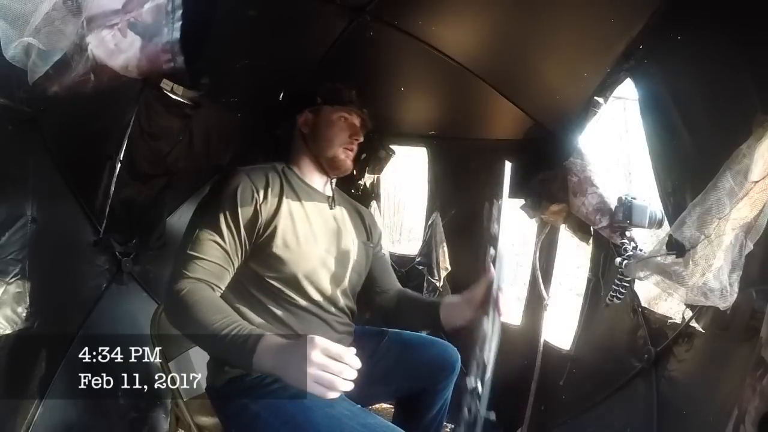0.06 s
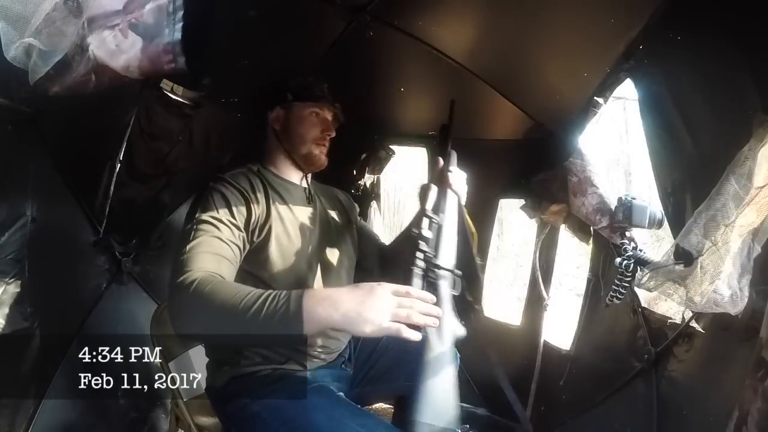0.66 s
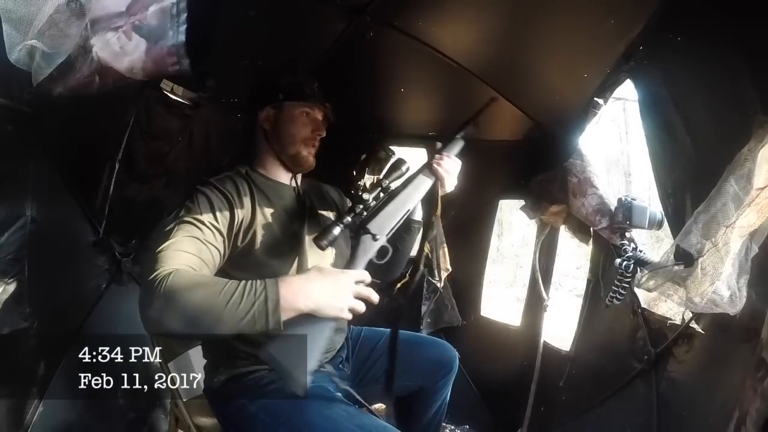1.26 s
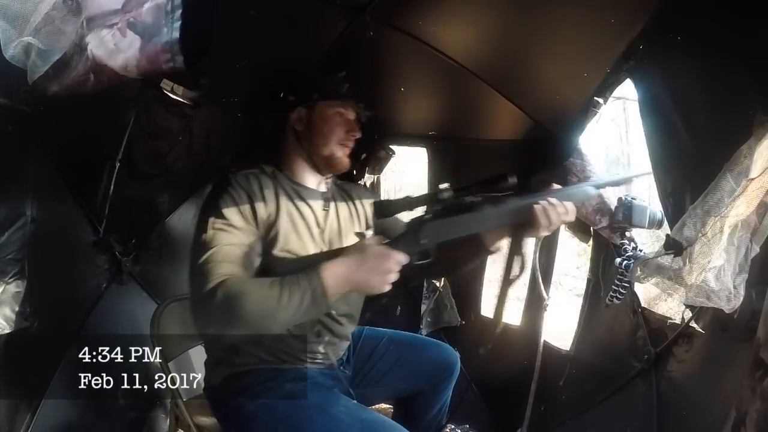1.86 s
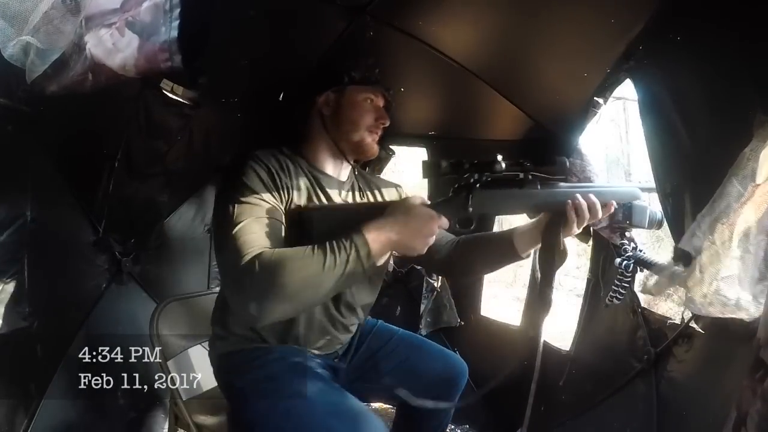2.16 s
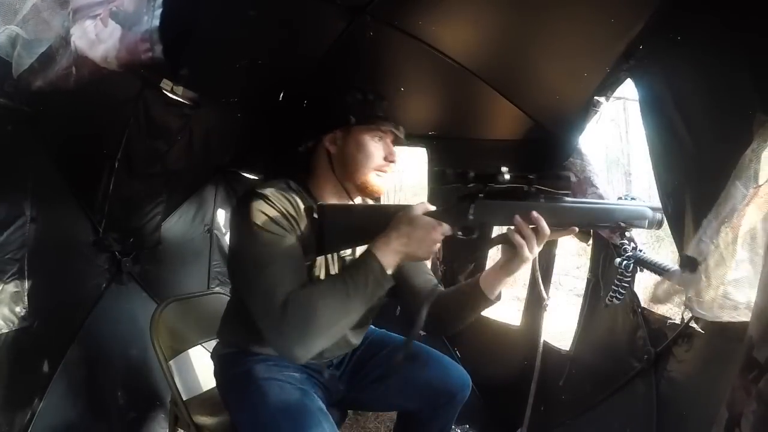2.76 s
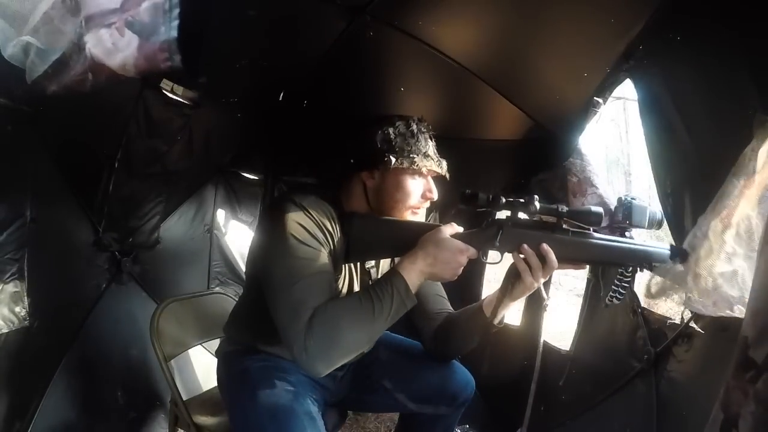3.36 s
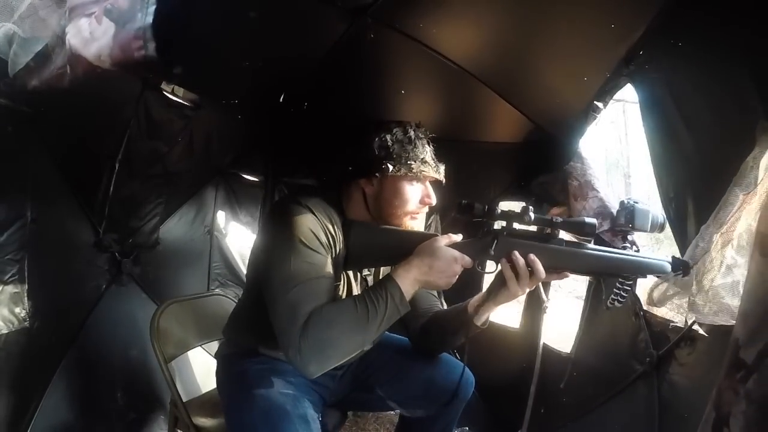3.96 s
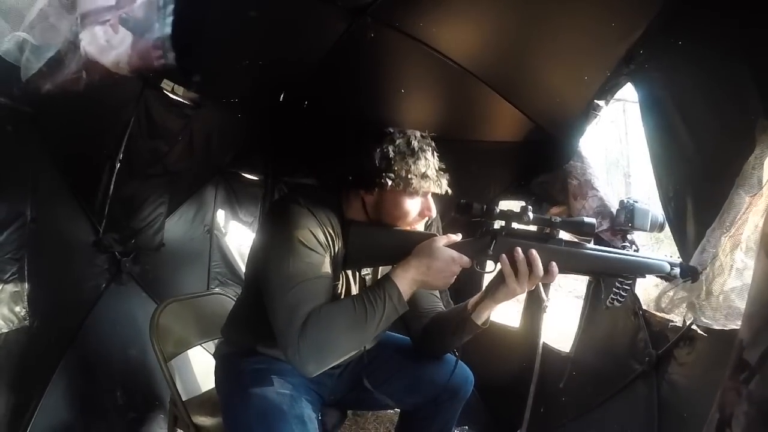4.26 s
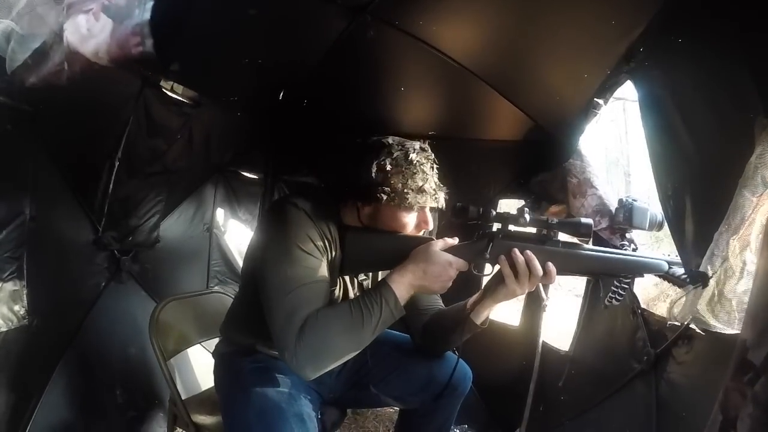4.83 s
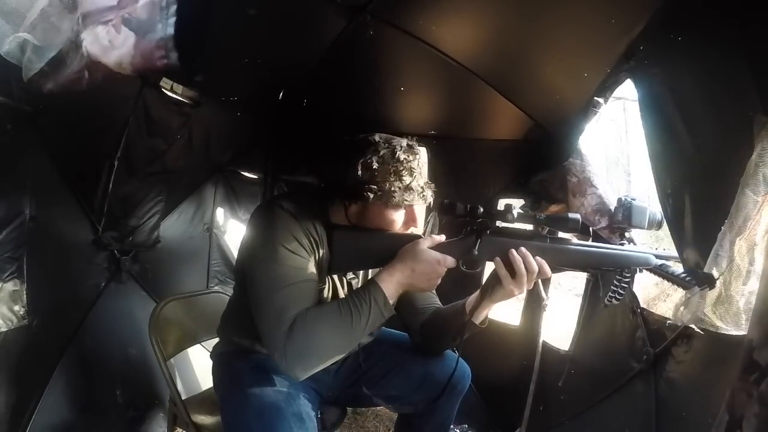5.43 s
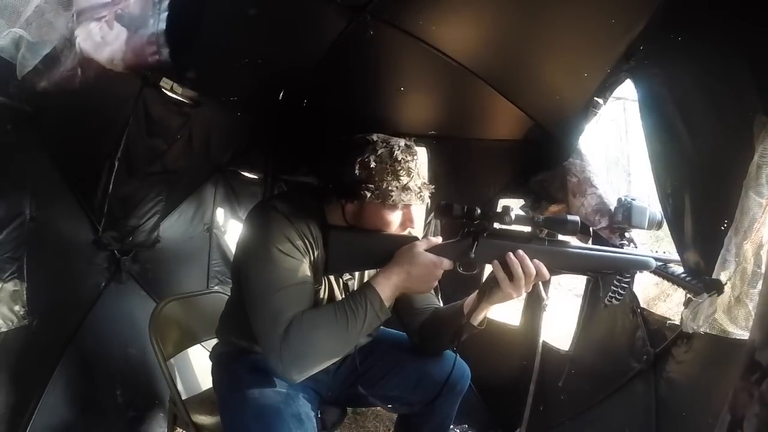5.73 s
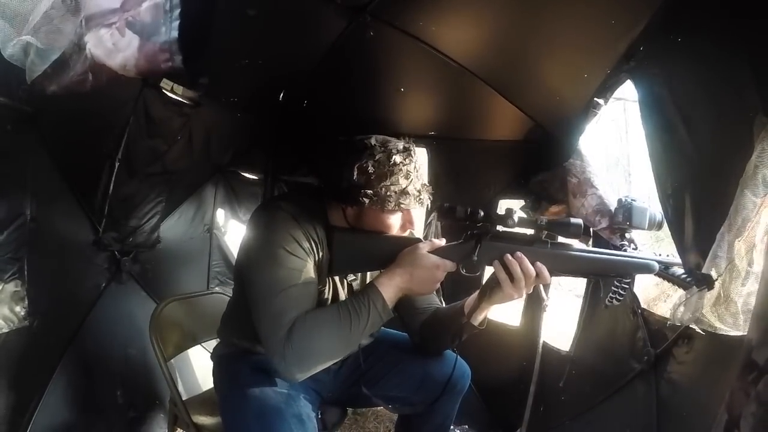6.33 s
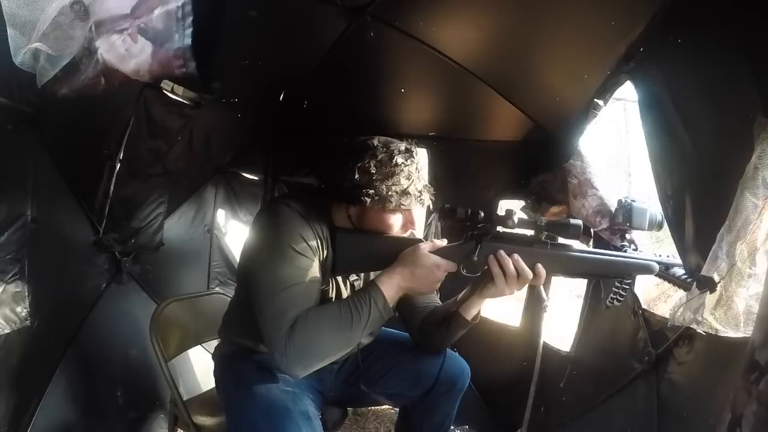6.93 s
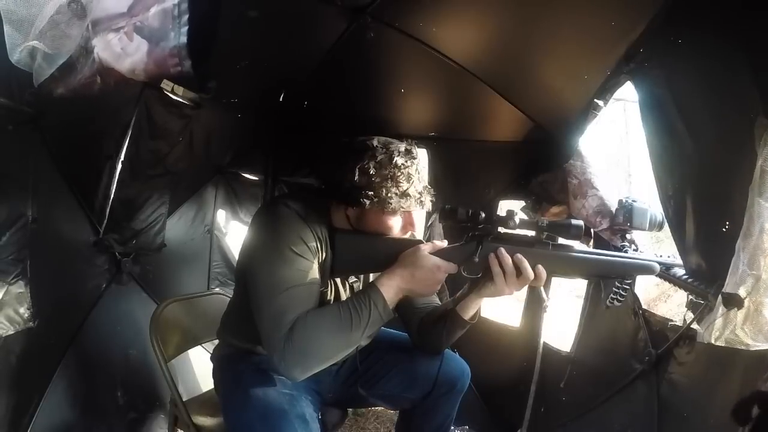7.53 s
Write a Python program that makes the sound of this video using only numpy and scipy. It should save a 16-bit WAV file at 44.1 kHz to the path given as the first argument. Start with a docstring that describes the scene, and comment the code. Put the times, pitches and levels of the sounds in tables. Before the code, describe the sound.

Cloth scuffs and a rifle bump in a hunting blind, followed by loud camera handling clacks and low rubbing over faint hiss.

```python
"""In a fabric hunting blind, a hunter shoulders a rifle: sleeves scuff, the rifle knocks once and its butt
swishes over his shirt. A hand then grips a camera and turns it on its stand: impacts excite clacks and
thuds, friction rumbles, and the gap between palm and microphone ports resonates with a hollow note.
The camera's gain ducks after the hardest clacks, and its stereo image closes to mono during the handling.
Beneath it all lie faint outdoor air, hiss and the throb of the electronics."""
import sys
import numpy as np
from scipy import signal
from scipy.fft import rfft, irfft, next_fast_len
from scipy.io import wavfile
from scipy.ndimage import uniform_filter1d, map_coordinates

SR = 44100
rng = np.random.default_rng(int(sys.argv[2]) if len(sys.argv) > 2 else 0)


def dump_mix(stems):
    """Bounce the given channels to the path in sys.argv[1] as a 16-bit WAV at rate SR."""
    frames = np.atleast_2d(stems).T  # one column per channel
    limited = np.clip(frames, -1, 1)  # hard clip at full scale
    pcm = np.round(limited * 32767).astype(np.int16)
    wavfile.write(sys.argv[1], SR, pcm)


N = 334913
TIME = np.arange(N) / SR

# Spectrum of the mount's vibration. Each row: frequency in Hz, relative density in dB.
SHIVER = [(70, -48.5), (130, 6.5), (168, 10.5), (205, 3), (300, -6.5), (500, -16), (1200, -67)]


def amp(db):
    """Decibels to amplitude ratio."""
    return 10 ** (np.asarray(db) / 20)


def unit(x):
    """Normalise to rms 1."""
    return x / np.sqrt(np.mean(x ** 2) + 1e-20)


def blow(x):
    """Normalise each channel of a transient to the energy of 10 ms at rms 1."""
    return x / np.sqrt(np.sum(x ** 2, -1, keepdims=True) / (SR / 100) + 1e-20)


def add(track, start, x):
    """Superpose x on the track, start seconds in."""
    i = round(start * SR)
    track[..., i:i + x.shape[-1]] += x[..., :N - i]


def wobble(rate):
    """Smooth random modulation with rate knots a second."""
    return map_coordinates(rng.standard_normal(int(N * rate / SR) + 4), [TIME * rate])


def swell(start, length, attack, release, db_per_s=0):
    """An envelope that rises, holds a steady slope in dB, then decays exponentially."""
    t = TIME - start
    rise = np.sin(np.pi / 2 * np.clip(t / attack, 0, 1)) ** 2
    return rise * amp(db_per_s * np.clip(t, 0, length)) * np.exp(-np.maximum(t - length, 0) / release)


def mode(t, hz, t60, cycles=0):
    """Free vibration: a sinusoid of given starting phase that falls 60 dB in t60 seconds."""
    return np.sin(2 * np.pi * (hz * t + cycles)) * amp(-60 * t / t60)


def filtered(x, response):
    """Linear filtering: multiply the spectrum by a frequency response."""
    n = x.shape[-1]
    size = next_fast_len(n + SR // 10)
    return irfft(rfft(x, size) * response(np.fft.rfftfreq(size, 1 / SR)), size)[..., :n]


def contour(points):
    """A response interpolated through (Hz, dB) points in log frequency."""
    f, db = np.transpose(points)
    return lambda hz: amp(np.interp(np.log(hz + 1), np.log(f), db))


def resonances(peaks):
    """The response of parallel (Hz, bandwidth Hz, dB) resonators of alternating polarity."""
    return lambda f: sum((-1) ** k * amp(db) * 1j * f * band / (hz * hz - f * f + 1j * f * band)
                         for k, (hz, band, db) in enumerate(peaks))


def noise(spectrum):
    """Gaussian noise of rms 1, coloured by (Hz, dB) points."""
    return unit(filtered(rng.standard_normal(N), contour(spectrum)))


def moving_band(centre_hz, q):
    """Noise of rms 1 through a gliding resonance."""
    hz, t, frames = signal.stft(rng.standard_normal(N), SR, nperseg=512)
    ratio = (hz[:, None] + 1) / np.interp(t, TIME, centre_hz)
    gain = 1 / (1 + (q * (ratio - 1 / ratio)) ** 2)
    return unit(signal.istft(frames * gain / np.linalg.norm(gain, axis=0), SR, nperseg=512)[1][:N])


def knocks(ring_hz=1491, shell_hz=620, push_hz=51, rock_hz=89, snap_t60=0.0028, reach_octaves=0.52):
    """Impact excitation: contacts on rifle, stand and camera set shell, metal and stand ringing."""
    # Contacts. Each row: start in seconds, crack level in dB, its t60 in seconds, its tilt in dB per
    # octave, snap pitch in Hz, snap level in dB, rebound delay in seconds, ring level in dB,
    # ping level in dB, thud pitch in Hz, thud level in dB, side gain in dB.
    contacts = [(.002, -47, 0.33, -3, 1290, -48, 0.0058, -55, -75, 356, -43, 4.5),
                (0.112, -53, 0.0066, 4, 3860, -43, 0.015, -71, -59, 200, -65, 2),
                (0.177, -38, 0.081, -1.5, 1020, -50, 0.0047, -61, -65, 260, -42, -6),
                (1.272, -25, 0.0087, -0.5, 2410, -30, 0.0021, -27.5, -40, 225, -42, 2.5),
                (1.866, -48, 0.027, 4, 2190, -51, 0.0047, -58, -52, 200, -62, -6.5),
                (2.707, -49, 0.016, -6, 1900, -59, 0.011, -65, -61, 192, -33.5, -2.5),
                (3.519, -31, 0.12, -2, 1100, -33.5, 0, -59, -54, 250, -18.5, 0),
                (3.533, -39, 0.023, -5, 2360, -51, 0.0049, -58, -43, 230, -35, 2.5),
                (3.549, -55, .011, -6, 1000, -56, 0.019, -55, -72, 145, -15, 3),
                (3.563, -39, 0.013, -4, 2900, -49, 0, -57, -65, 160, -42, 4),
                (3.567, -32.5, 0.072, -6.5, 3650, -39.5, 0.0022, -39, -41.5, 156, -31, 0.5),
                (3.807, -43, 0.02, -3, 2780, -50, 0.0085, -48, -61, 250, -38, 1),
                (3.82, -35, 0.019, -7, 2760, -38, 0.0036, -52, -53, 199, -20.5, -1.5),
                (3.8254, -38, 0.018, -4, 2880, -44.5, 0.015, -48, -50.5, 200, -27.5, -1.5),
                (3.8294, -2.5, 0.012, -1.5, 2360, -1.5, 0.0019, -15.5, -23, 183, -12.5, -5),
                (3.844, -31, 0.073, -8, 2900, -41.5, 0, -33.5, -58.5, 200, -31, 1),
                (3.861, -22.5, 0.017, -2, 2420, -23, 0.0036, -33, -42.5, 198, -28.5, -3.5),
                (3.87, -42, .006, 0, 3050, -35.5, 0.00079, -32, -44, 176.5, -9.5, 2),
                (3.912, -32, 0.0073, -5, 2730, -33, 0, -36, -58, 240, -17, -0.5),
                (3.959, -45, .059, 0.5, 1710, -51.5, 0.0046, -54, -63.5, 185, -20.5, 6.5),
                (3.995, -29.5, 0.0096, -3.5, 3600, -46, 0.0092, -51, -50, 201, -14, -1),
                (4.011, -31.5, 0.013, -6, 2400, -46, 0.0063, -52, -66.5, 203, -30, 1.5),
                (4.022, -29, 0.027, -3.5, 2410, -31, 0.005, -42.5, -54, 200, -25.5, -3),
                (4.0328, -10, 0.016, -2.5, 2290, -5.5, 0.00027, -15, -44.5, 192.7, -6, -4),
                (4.047, -37.5, 0.096, -7, 2400, -39.5, 0.0049, -36, -58, 170, -22.5, 3),
                (4.057, -34, .07, -7, 2700, -42.5, 0.0065, -38.5, -57.5, 149.5, -20, -3),
                (4.077, -50.5, .01, -6, 2200, -46.5, 0, -51, -67, 151, -17, 7.5),
                (4.753, -55, .04, -10, 620, -50, 0, -64, -75, 229, -33, 7.5),
                (4.989, -47.5, 0.024, -11.5, 1490, -58, 0.015, -53, -59, 201, -39, -3),
                (5.029, -47, 0.017, -5, 1400, -55, 0.014, -50, -55, 300, -30.5, -1),
                (5.04, -32, 0.12, 5, 1490, -47, 0.006, -46, -46, 275, -21.5, -1.5),
                (5.0523, -23, 0.015, 1.5, 2870, -21.5, 0.0031, -29, -30.5, 296, -20, 13.5),
                (5.058, -33, 0.062, -7, 3200, -49, 0.015, -41, -54, 287, -21, 2),
                (5.0823, -27.5, 0.0096, 0, 3030, -31, 0.008, -35, -49, 340, -20.5, 10),
                (5.0838, -28, 0.028, -1, 3030, -23, 0.001, -38, -34, 330, -25, 0.5),
                (5.32, -30, 0.015, -4.5, 2950, -37.5, 0.0023, -56, -42, 260, -28, 0),
                (5.795, -43.5, 0.15, -3, 600, -39.5, 0.0025, -59, -54.5, 113, -36, 0),
                (5.808, -49, .03, -11, 620, -54, 0.014, -65, -65, 143, -19.5, -1.5),
                (6.055, -59, .04, 2, 562, -58, 0.025, -59, -75, 172, -26.5, 0)]
    # Housing resonances. Each row: frequency in Hz, bandwidth in Hz, gain in dB.
    housing = [(520, 1600, 3), (1360, 710, 13), (2135, 540, 15), (2920, 2300, 9), (4080, 500, -23.5),
               (5960, 1200, -22.5), (10500, 2800, -20)]
    # Modes of the stand. Each row: frequency in Hz, relative level in dB, t60 in seconds.
    stand_modes = [(129, -10.5, 0.094), (161.3, -2.5, 0.15), (208, -6.5, 0.1), (275.6, -3, 0.073),
                   (343, -6.5, 0.087), (385, -11, 0.17), (474, -4, 0.16), (744, 8, 0.17)]
    # Further colouring of the side channel. Each row: frequency in Hz, gain in dB.
    spread = [(60, -5.5), (170, 5.5), (1100, 9), (2200, 1), (4000, -3), (12000, 2)]
    out, t = np.zeros((2, N)), np.arange(SR // 3) / SR
    burst = lambda t60, response: blow(
        filtered(rng.standard_normal((2, len(t))) * amp(-60 * t / t60), response))
    for (start, crack_db, crack_t60, tilt_db, snap_hz, snap_db, rebound,
         ring_db, ping_db, thud_hz, thud_db, side_db) in contacts:
        tilt = lambda hz: amp(tilt_db * np.log2(1 + hz / shell_hz))
        colour = lambda hz: resonances(housing)(hz) * tilt(hz) / (1 + (hz / 10500) ** 6)
        crack = burst(crack_t60, colour)
        crack += amp(-24) * burst(0.12, lambda hz: colour(hz) / (1 + (hz / 3500) ** 4))
        # The snap reaches the two ports at different phases; a rebound strikes again.
        quadrature = np.array([[0], [0.25]])
        strike = lambda age: mode(age, snap_hz, snap_t60, quadrature) * (1 - np.exp(-age / 0.00092))
        snap = blow(strike(t) + amp(-3) * strike(np.maximum(t - rebound, 0)))
        # Hard snaps flex the shell more than in proportion.
        flex = amp(1.4 * snap_db - 4) * blow(mode(t, shell_hz, t60=0.005))
        ring = blow(mode(t, ring_hz * (1 + rng.normal(0, 0.016)), t60=0.031)) * amp([[0], [1]])
        ping = burst(0.015, resonances([(6070, 460, 0)]))  # small metal fittings
        stand = np.zeros((2, len(t)))
        for hz, db, t60 in stand_modes:
            coupling = np.exp(-(np.log2(hz / thud_hz) / reach_octaves) ** 2 / 2)
            gain = coupling * amp(db + rng.normal(0, 2.5)) * rng.choice([-1, 1], (2, 1))
            stand += gain * mode(t, hz * (1 + rng.normal(0, 0.025)), t60)
        thud = blow(stand * (1 - np.exp(-t / 0.00025)))
        # The whole camera is shoved and rocks.
        shove = mode(t, push_hz * np.exp(rng.normal(0, 0.094)), t60=0.21)
        rock = amp(-1) * mode(t, rock_hz, t60=0.21)
        push = blow((shove - rock) * (1 - np.exp(-t / 0.0048)))
        click = amp(crack_db) * crack + amp(snap_db) * snap + amp(ring_db) * ring + amp(ping_db) * ping
        shake = amp(thud_db) * thud + (flex + amp(thud_db + 1.5) * push) * amp([[0], [-5]])
        add(out, start, (click + shake) * amp([[0], [side_db]]))
    return np.array([out[0], filtered(out[1], contour(spread))])


def grip(lump_rate=24, lump_db=2.5, sway_db=5):
    """Stick-slip friction: fingers rumble and rub on the housing in bumps and sway it sideways."""
    # Pushes of the hand. Each row: start and length in seconds, rumble and rub levels in dB.
    pushes = [(3.553, 0.2, -30, -35), (3.821, 0.14, -15, -18.5), (4.014, 0.036, -11, -19),
              (4.25, 0.033, -25.5, -39), (4.349, 0.15, -34, -34), (4.552, 0.33, -34.5, -42),
              (4.904, 0.13, -30, -38.5), (5.033, 0.016, -10, -23.5), (5.143, 0.081, -37, -34.5),
              (5.248, 0.14, -22.5, -34.5), (5.423, 0.16, -30, -35), (5.759, 0.22, -26, -38),
              (6.028, 0.1, -28.5, -35), (6.165, 0.19, -30.5, -38.5), (6.37, 0.17, -43.5, -58),
              (6.83, 0.62, -69, -47)]
    # Friction spectra. Each row: frequency in Hz, relative density in dB.
    rumble_spectrum = [(15, -8), (28, 9.5), (52, 13), (90, 6.5), (130, -7), (250, -71.5)]
    rub_spectrum = [(60, -55.5), (110, 1.5), (170, 5), (290, -12), (450, -20.5), (800, -36), (2000, -33),
                    (6000, -67)]
    rumble, rub = np.zeros((2, N))
    for start, length, rumble_db, rub_db in pushes:
        effort = swell(start, length, attack=0.039, release=0.055, db_per_s=-16)
        rumble += amp(rumble_db) * effort
        rub += amp(rub_db) * effort
    lumps = unit(amp(lump_db * np.tanh(wobble(lump_rate))))
    mid = lumps * (rumble * noise(rumble_spectrum) + rub * noise(rub_spectrum))
    return np.array([mid, amp(sway_db) * rub * noise(SHIVER)])


def rifle(rise_s=0.0052, split_hz=22):
    """Modal vibration: padded bumps excite the rifle's low modes; a sling fitting's close pair beats."""
    # Bumps on hand and knee. Each row: start in seconds, body level in dB, clink pitch in Hz,
    # clink level in dB, clink t60 in seconds.
    bumps = [(0, -42, 1280, -41, 0.11), (.172, -43, 1060, -43.5, 0.11), (1.267, -17.5, 998, -38.5, 0.022)]
    # Modes of the rifle. Each row: frequency in Hz, relative level in dB, t60 in seconds.
    body_modes = [(48, -1.5, 0.11), (164, 0, 0.083), (207, -12.5, 0.26), (289, -4, 0.1), (381, -22.5, 0.39)]
    out, t = np.zeros((2, N)), np.arange(SR // 3) / SR
    ring = lambda hz, t60: mode(t, hz, t60, cycles=rng.random((2, 1)))
    rise = np.sin(np.pi / 2 * np.clip(t / rise_s, 0, 1)) ** 2
    for start, body_db, clink_hz, clink_db, clink_t60 in bumps:
        body = blow(rise * sum(amp(db) * ring(hz, t60) for hz, db, t60 in body_modes))
        clink = blow(rise * (ring(clink_hz - split_hz, clink_t60) + ring(clink_hz + split_hz, clink_t60)))
        add(out, start, amp(body_db) * body * amp([[0], [8]]) + amp(clink_db) * clink * amp([[0], [2]]))
    return out


def cloth(grain_rate=260, grain_db=1.7):
    """Sliding friction: fabric moves in tiny slips; strokes swell, bright bursts start sharply and fade."""
    # Strokes of shirt and sleeves. Each row: start and length in seconds, level in dB.
    strokes = [(0.803, 0.21, -60), (1.895, 0.21, -57), (2.078, 0.29, -48), (2.16, 0.23, -31),
               (2.247, 0.1, -43.5), (2.422, 0.28, -56.5), (2.663, 0.17, -48.5), (2.816, 0.14, -55.5),
               (3.083, 0.2, -54.5)]
    # Short bright noise bursts: cloth scuffs and the sizzle of a clack.
    # Each row: start in seconds, level in dB, seconds to fall 30 dB.
    bursts = [(0.105, -43, 0.2), (0.176, -38, 0.084), (1.858, -41, 0.062), (3.249, -47, 0.022),
              (3.446, -39.5, 0.014), (5.074, -31.5, 0.047)]
    # Spectrum of the swish. Each row: frequency in Hz, relative density in dB.
    swish = [(150, -57), (330, -6.5), (700, -9.5), (1300, 2), (2500, 1), (4000, 1), (7000, -4.5),
             (10200, -15.5), (11400, -21.5), (14500, -24), (15500, -47.5)]
    level = sum(amp(db) * swell(start, length, attack=0.068, release=0.024, db_per_s=7)
                for start, length, db in strokes)
    t = np.arange(SR // 3) / SR
    for start, db, fall in bursts:
        add(level, start, amp(db - 30 * t / fall) * (1 - np.exp(-t / 0.0025)))
    slips = unit(amp(grain_db * wobble(grain_rate)))
    return level * slips * np.array([noise(swish), amp(-2) * noise(swish)])


def mount(mid_db=-8.5):
    """Damped vibration: the hunter's movements nudge the mount, which shivers mostly sideways."""
    # Nudges. Each row: start in seconds, level in dB.
    nudges = [(0, -45), (.2, -55), (.89, -36), (1.08, -35.5), (1.27, -47), (2.06, -38.5), (2.71, -31.5),
              (3.23, -34.5), (3.499, -23.5), (7.44, -37.5), (7.52, -38)]
    level = sum(amp(db) * swell(start, length=0.04, attack=0.04, release=0.09) for start, db in nudges)
    shiver = level * noise(SHIVER)
    return np.array([amp(mid_db) * shiver, shiver])


def gap(hollow_hz=420, octaves_per_s=2.82, overtone_ratio=2.13, lower_hz=8730, upper_hz=10440):
    """Cavity resonance: as the gap under the palm widens, two hollow notes climb and two whistles sag."""
    # Widenings after each new grip. Each row: start and length in seconds, level in dB.
    openings = [(4.146, 0.61, -45), (5.007, 0.74, -43.5)]
    # Whistles. Each row: start and length in seconds, sag in Hz per second, lower and upper levels in dB.
    whistles = [(4.12, 0.39, 1400, -59.5, -60), (5.05, 0.33, 600, -60.5, -58.5)]
    age, sag, hollow, lower, upper = np.zeros((5, N))
    for start, length, db in openings:
        age = np.where(TIME > start, np.minimum(TIME - start, length), age)
        hollow += amp(db) * swell(start, length, attack=0.058, release=0.2, db_per_s=-15)
    for start, length, sag_rate, lower_db, upper_db in whistles:
        sag = np.where(TIME > start, sag_rate * np.minimum(TIME - start, length), sag)
        lower += amp(lower_db) * swell(start, length, attack=0.058, release=0.04, db_per_s=-13)
        upper += amp(upper_db) * swell(start, length, attack=0.058, release=0.04, db_per_s=-44.5)
    whistling = lower * moving_band(lower_hz - sag, q=9) + upper * moving_band(upper_hz - sag, q=7)
    note_hz = hollow_hz * 2 ** (octaves_per_s * age)
    overtone = amp(-12) * moving_band(overtone_ratio * note_hz, q=2.5)
    flicker = amp(1.5 * wobble(14))
    notes = hollow * flicker * (moving_band(note_hz, q=1.25) + overtone)
    return np.array([notes + whistling, np.zeros(N)])


def palm(octaves_per_s=-7):
    """Friction noise: skin drags on the housing in a low, narrow band that sinks as the hand slows."""
    # Groans. Each row: start and length in seconds, starting pitch in Hz, level in dB.
    groans = [(4.39, 0.12, 380, -39.5), (5.35, 0.16, 396, -42), (6.12, 0.16, 343, -46.5)]
    level, pitch = np.zeros(N), np.full(N, groans[0][2])
    for start, length, hz, db in groans:
        level += amp(db) * swell(start, length, attack=0.045, release=0.013)
        glide = hz * 2 ** (octaves_per_s * np.clip(TIME - start, 0, length))
        pitch = np.where(TIME > start, glide, pitch)
    return np.array([level * moving_band(pitch, q=2.5), np.zeros(N)])


def stock():
    """Forced resonance: friction against hand and shoulder makes the rifle's stock sing faintly."""
    # Rubs. Each row: start and length in seconds, levels of the low and the upper modes in dB.
    squeaks = [(-.03, 0.028, -41, -60), (1.894, .15, -59.5, -84), (2.476, 0.1, -51, -54),
               (2.743, 0.077, -57, -65.5), (2.9, 0.036, -55.5, -56)]
    # Modes of the stock. Each row: frequency in Hz, bandwidth in Hz, relative gain in dB.
    low_modes = [(1500, 110, 2), (2020, 73, -4.5)]
    upper_modes = [(3550, 110, 2.5), (5570, 290, -8)]
    low, upper = np.zeros((2, N))
    for start, length, low_db, upper_db in squeaks:
        rub = swell(start, length, attack=0.035, release=0.029)
        low += amp(low_db) * rub
        upper += amp(upper_db) * rub
    sing = lambda modes: unit(filtered(rng.standard_normal((2, N)), resonances(modes)))
    return low * sing(low_modes) + upper * sing(upper_modes)


def noise_floor(period_s=0.1024, first_s=0.04, mono_boost_db=8):
    """Broadband air and microphone hiss, with a pulse train from the electronics that grows in mono."""
    # Spectra of air and hiss. Each row: frequency in Hz, relative density in dB.
    air_mid = [(30, -5), (100, -20), (160, -3.5), (253, -11), (415, -14.5), (612, -17), (1650, -23.5),
               (2400, -28), (9650, -34), (12800, -41.5), (15500, -54.5)]
    air_side = [(35, -64.5), (60, -37.5), (102, -20), (139, -5.5), (159, -3.5), (266, -10), (497, -11.5),
                (869, -11), (1870, -22.5), (3760, -38), (5840, -32), (9740, -35.5), (14100, -45),
                (15500, -62)]
    since = (TIME - first_s + period_s / 2) % period_s - period_s / 2
    pulse = lambda delay, sigma: np.exp(-((since - delay) / sigma) ** 2 / 2)
    # Each throb is a quick dip and a push, then a slower swing back.
    shape = -0.7 * pulse(-0.0023, 0.001) + pulse(0, 0.0014) - 0.2 * pulse(0.01, 0.006)
    throb = shape * amp(-33 + mono_boost_db * (1 - width()) ** 2 + 2.2 * wobble(5.7))
    return np.array([amp(-49) * noise(air_mid) + throb, amp(-46) * noise(air_side)])


def width(narrows_at_s=4.056, narrow_db_per_s=54, widens_at_s=6.194, widen_s=0.89):
    """Side gain sets stereo width: it closes once the camera is held and slowly opens again."""
    closing = amp(-narrow_db_per_s * np.maximum(TIME - narrows_at_s, 0))
    return closing + 1 - np.exp(-np.maximum(TIME - widens_at_s, 0) / widen_s)


def scene(bass_hz=130, thin_db=-24, fills_at_s=3.64, thins_at_s=7.02):
    """Superposition in mid and side, decoded to left and right; the bass fills in during the grip."""
    mix = knocks() + rifle() + cloth() + stock() + grip() + palm() + gap() + mount() + noise_floor()
    bass = filtered(mix, lambda hz: 1 / (1 + (hz / bass_hz) ** 20))
    thinness = 1 - np.clip((TIME - fills_at_s) / 0.092, 0, 1) + np.clip((TIME - thins_at_s) / 2.6, 0, 1)
    mid, side = mix + (amp(thin_db * thinness) - 1) * bass
    return np.array([mid + width() * side, mid - width() * side])


def record(dry, threshold_db=-7, release_db_per_s=14, top_hz=15800):
    """Automatic gain control ducks at once and recovers slowly; peaks clip and the band is limited."""
    power = np.abs(uniform_filter1d(np.mean(dry ** 2, 0), size=130))
    excess_db = np.maximum(10 * np.log10(power + 1e-12) - threshold_db, 0)
    recovery = release_db_per_s * TIME
    duck_db = uniform_filter1d(np.maximum.accumulate(excess_db + recovery) - recovery, size=40)
    return filtered(np.clip(dry * amp(-duck_db), -1, 1), lambda hz: hz < top_hz)


dry = scene()
out = record(dry)
dump_mix(out)
```